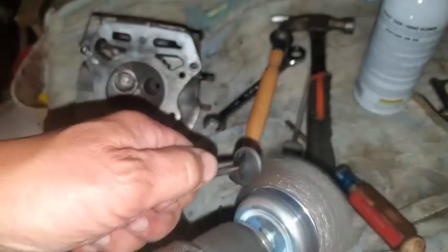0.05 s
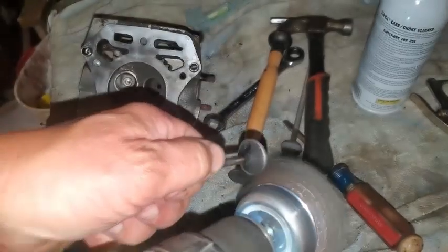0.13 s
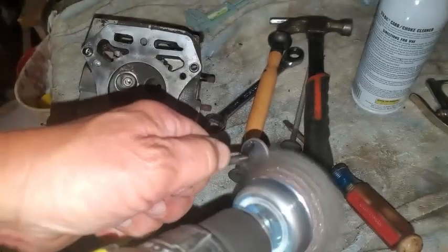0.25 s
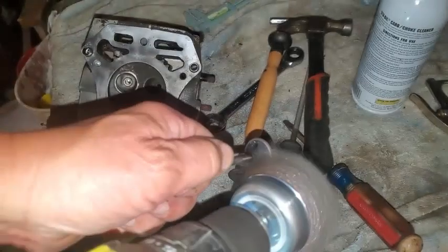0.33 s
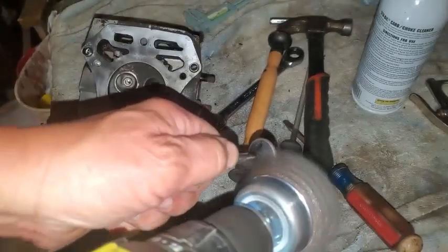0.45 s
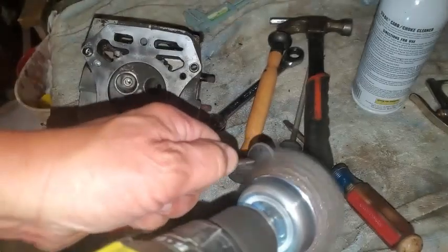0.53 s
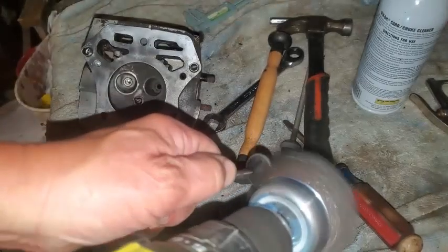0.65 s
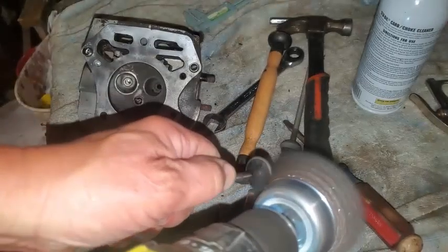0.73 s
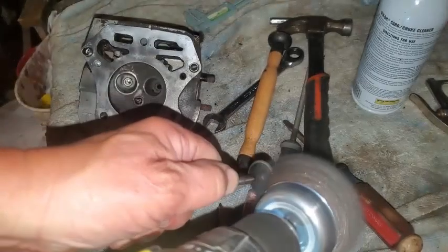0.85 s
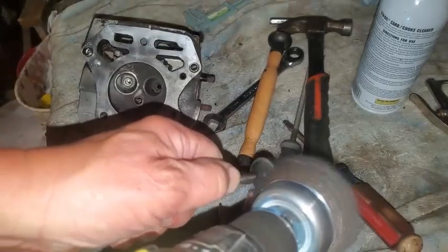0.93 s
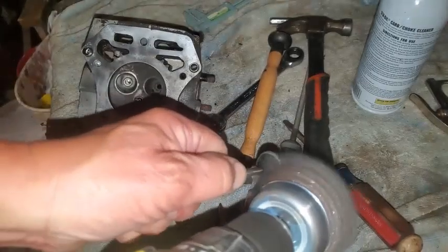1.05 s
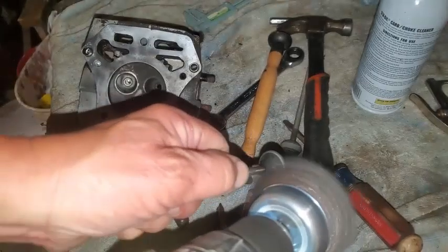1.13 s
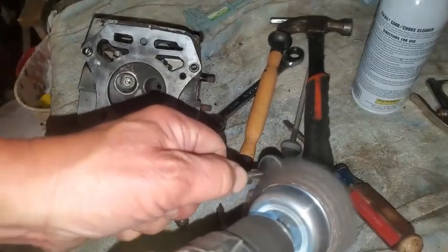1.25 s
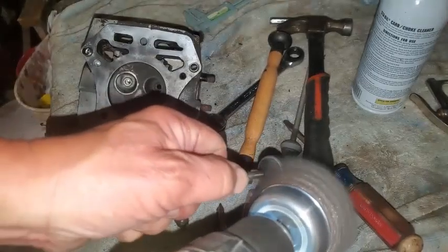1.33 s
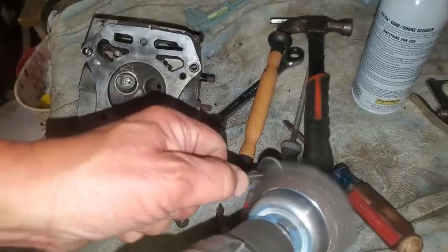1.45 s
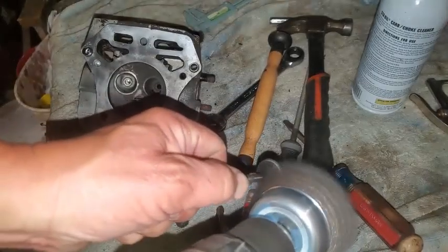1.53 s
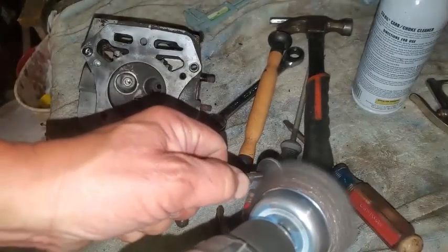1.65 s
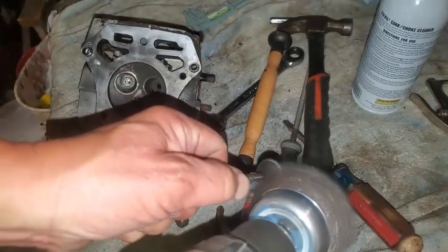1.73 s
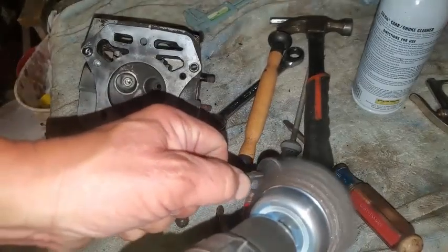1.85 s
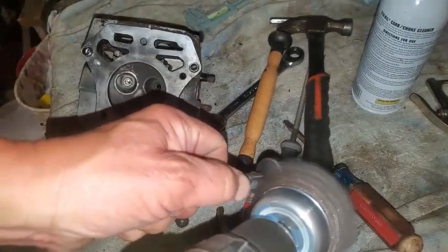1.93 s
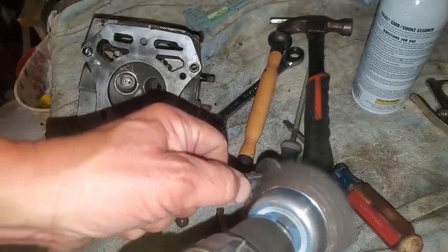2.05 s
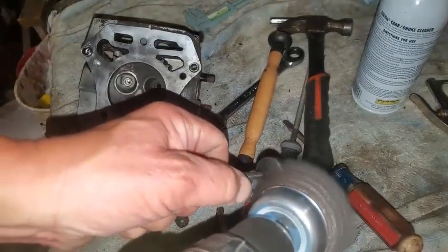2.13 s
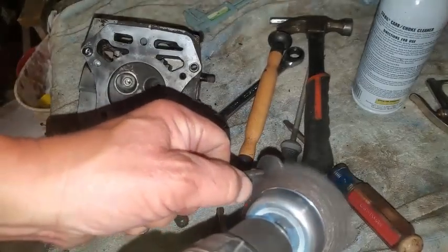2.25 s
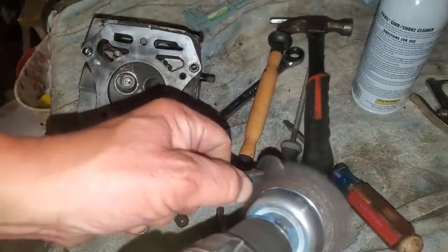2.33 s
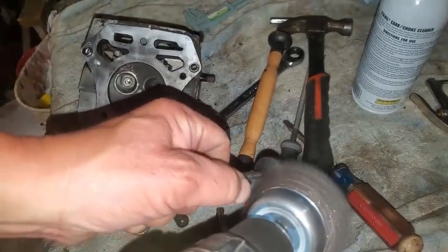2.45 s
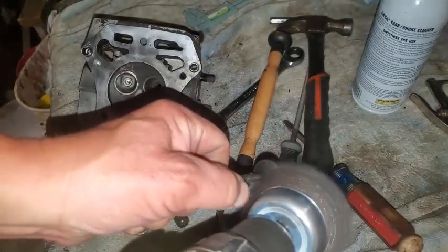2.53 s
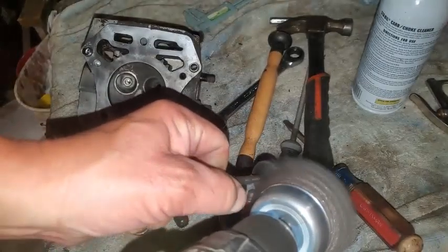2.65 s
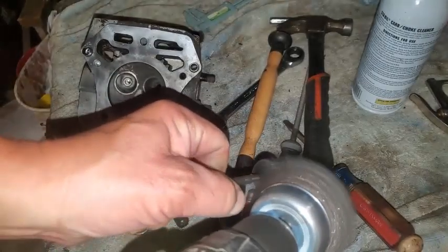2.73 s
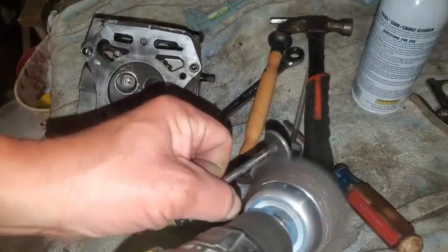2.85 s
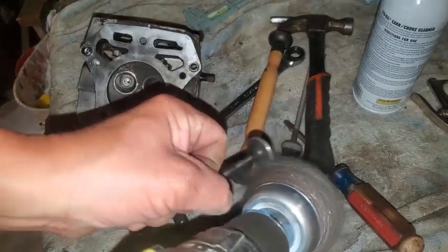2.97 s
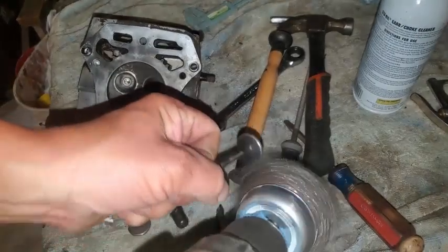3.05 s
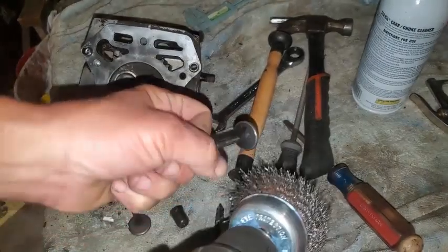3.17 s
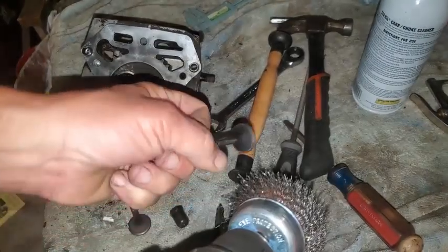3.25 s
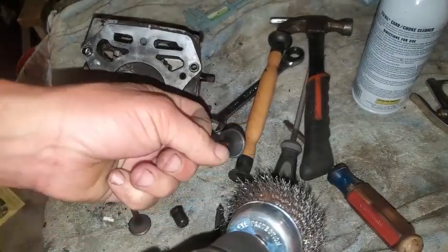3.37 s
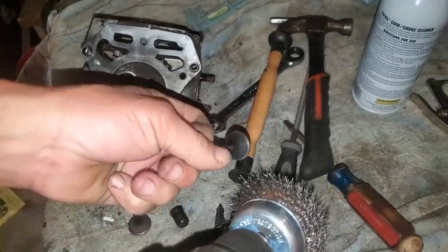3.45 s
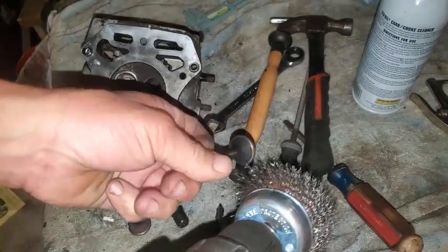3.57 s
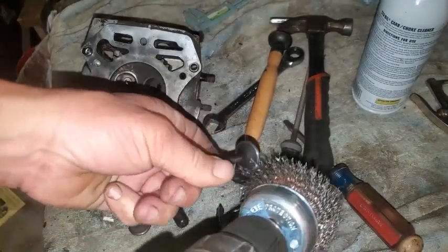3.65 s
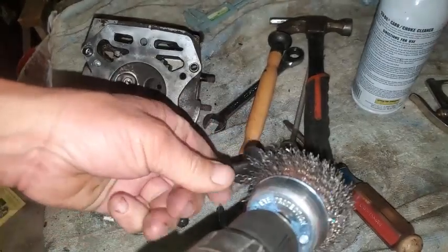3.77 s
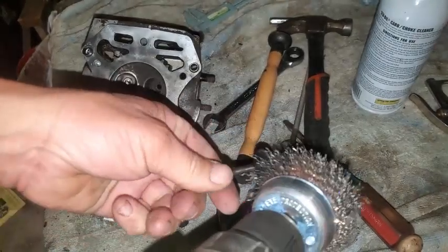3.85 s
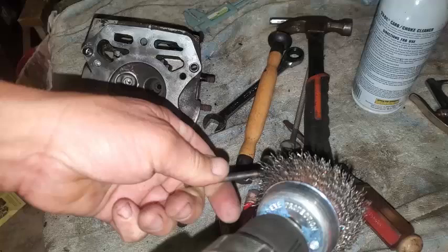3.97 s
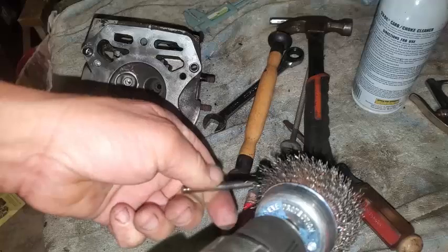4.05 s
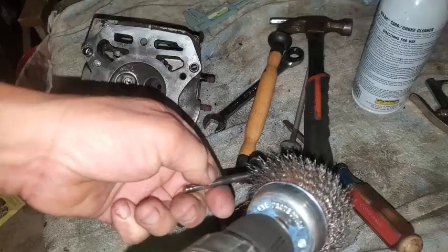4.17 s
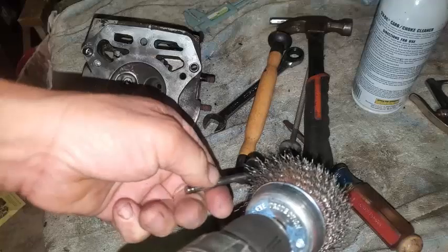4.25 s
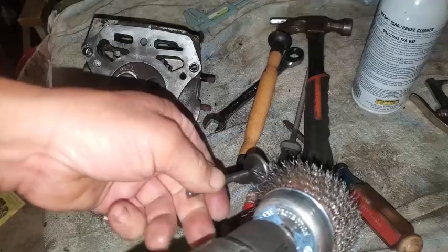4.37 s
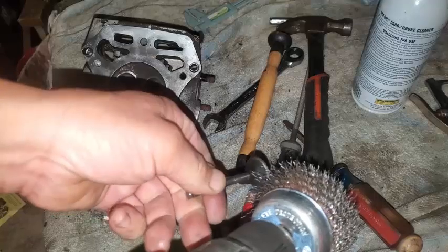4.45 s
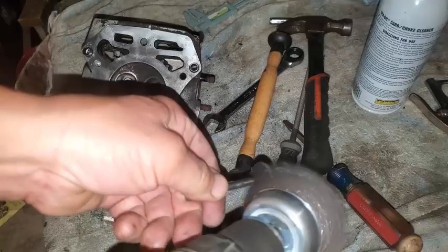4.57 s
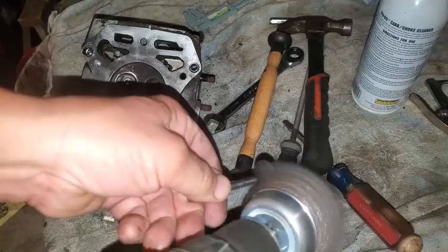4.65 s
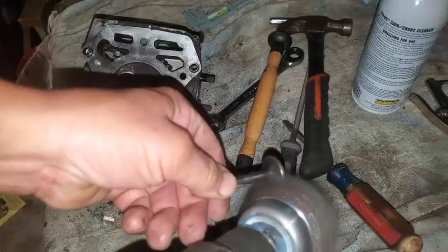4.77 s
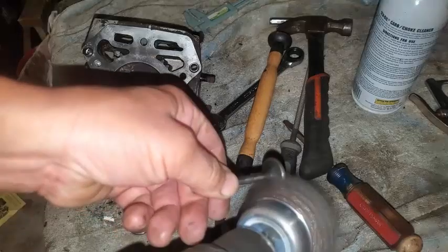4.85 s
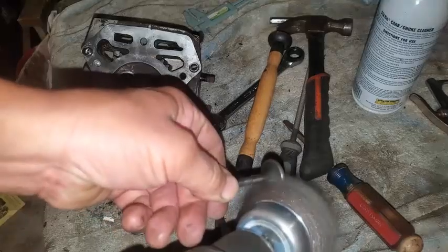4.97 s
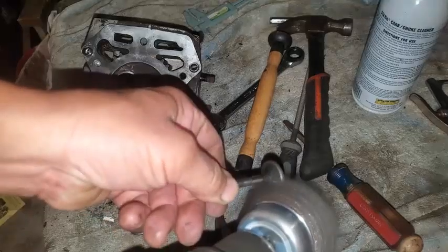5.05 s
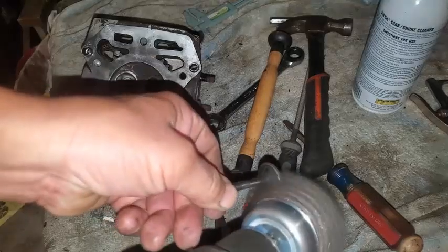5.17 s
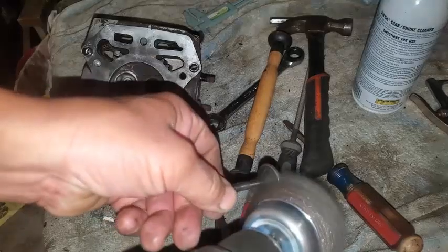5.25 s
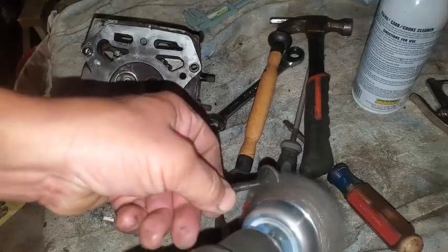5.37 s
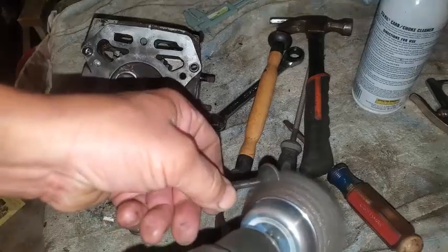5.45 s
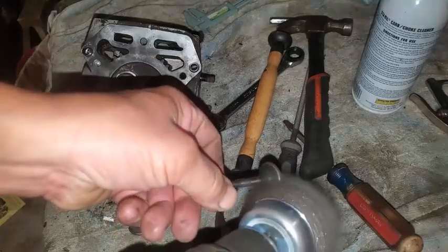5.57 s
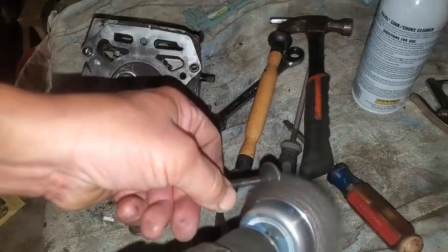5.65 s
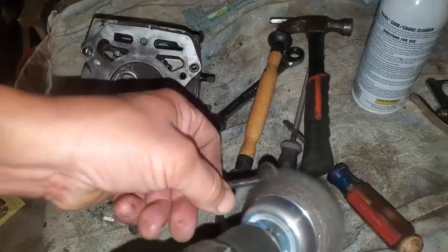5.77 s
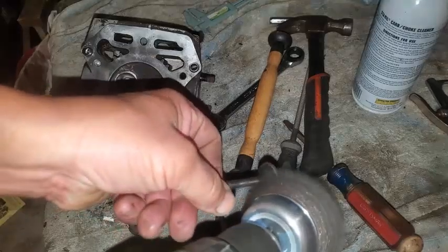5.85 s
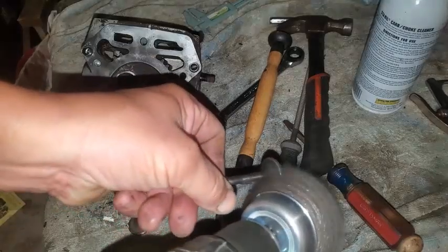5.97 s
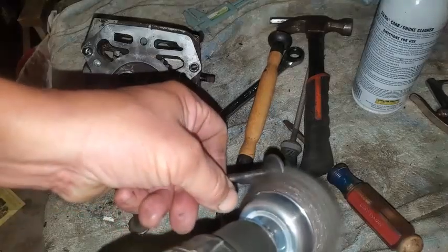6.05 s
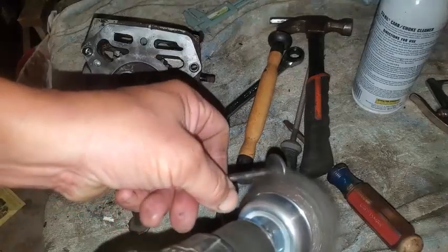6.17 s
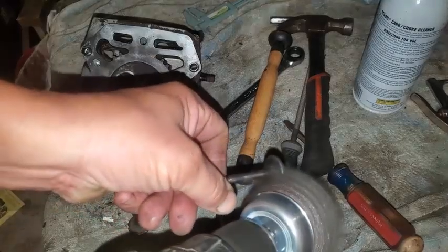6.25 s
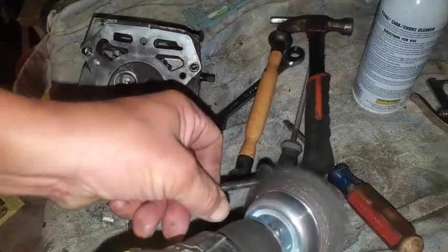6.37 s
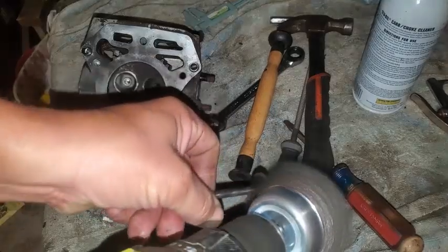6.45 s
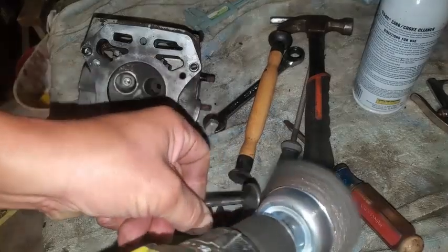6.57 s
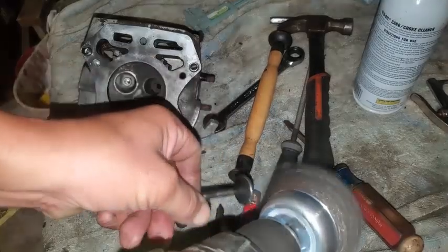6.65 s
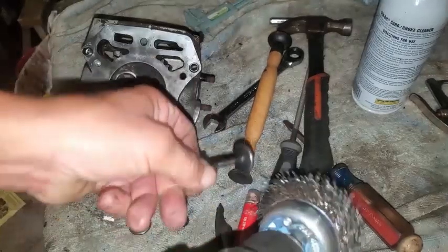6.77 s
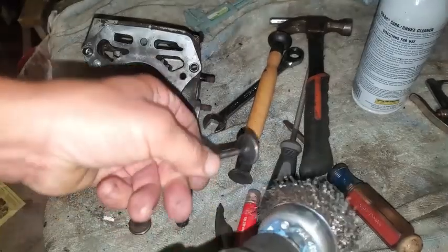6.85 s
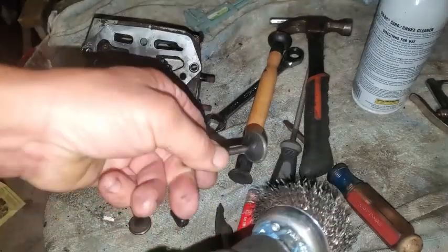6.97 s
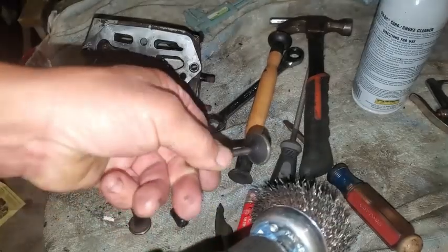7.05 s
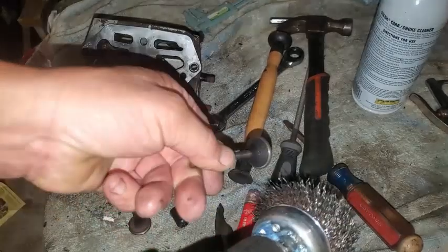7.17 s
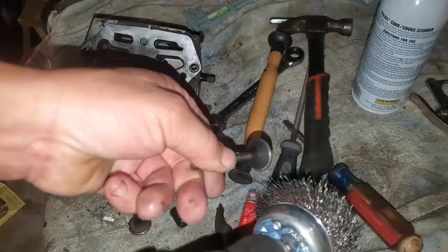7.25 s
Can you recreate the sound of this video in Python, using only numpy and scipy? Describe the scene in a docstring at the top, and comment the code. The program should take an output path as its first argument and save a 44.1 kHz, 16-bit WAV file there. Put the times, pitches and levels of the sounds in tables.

```python
"""Cordless drill with wire wheel on a steel valve

Two bursts close to a phone over a workbench: shaft-locked tones whine up to speed and howl down under the brake.
Random tiny impacts through resonances make wire tips scrub steel and gears rasp; a narrow hiss follows the motor.
Short noise bursts are knocks of chuck and gears; soft noise bands are fingers and valve on the still tool.
A low workshop hum of wavering tones and filtered air lies beneath, with a short room tail."""
import sys
import numpy as np
from scipy import signal
from scipy.fft import rfft, irfft, next_fast_len
from scipy.io import wavfile
from scipy.ndimage import uniform_filter1d, minimum_filter1d

SR = 44100
rng = np.random.default_rng(int(sys.argv[2]) if len(sys.argv) > 2 else 0)


def output_pcm(signal):
    """Save a mono or channel-first signal as 16-bit PCM at the path in sys.argv[1].

    Samples are clipped to [-1, 1] before scaling.
    """
    pcm = np.clip(np.atleast_2d(signal).T, -1, 1) * 32767
    wavfile.write(sys.argv[1], SR, np.round(pcm).astype(np.int16))


N = 322371
T = np.arange(N) / SR
GEAR_RATIO = 14.35  # shaft turns per wheel turn
TOP_SPEED_HZ = 379.5  # usual top speed of the motor shaft, turns a second
WHEEL_LAG, MOTOR_LAG, HISS_LAG = 8, 2, 10  # delay to the right port, samples
BRAKE_S = .158  # time the brake takes to stop the shaft
# trigger pulls: on_s, off_s, scrub_db (wires on steel, once settled), lift_s (valve taken away), drop_db (when lifted)
PULLS = [(-0.0105, 2.985, -24.5, 3.034, 8), (4.602, 6.677, -24.5, 6.711, 10)]


def amp(db):
    """Decibels to gain."""
    return 10 ** (np.asarray(db) / 20)


def unit(x):
    """Scale to rms 1."""
    return x / np.sqrt(np.mean(x ** 2))


def curve(rows):
    """A level or speed that moves in straight lines between (s, value) points."""
    seconds, values = np.transpose(rows)
    return np.interp(T, seconds, values)


def walk(rate):
    """Smooth random drift of rms 1; rate is new random values a second."""
    k = int(SR / rate)
    steps = np.repeat(rng.standard_normal(N // k + 1), k)
    return unit(uniform_filter1d(uniform_filter1d(steps, k), k)[:N])


def colour(x, points, power=1):
    """Filter by a spectrum of (Hz, dB) points, joined on a log frequency axis."""
    hz, db = np.transpose(points)
    size = next_fast_len(x.shape[-1] + 4096)
    f = np.maximum(np.fft.rfftfreq(size, 1 / SR), 1)
    gain = amp(power * np.interp(np.log(f), np.log(hz), db))
    return irfft(rfft(x, size) * gain, size)[..., :x.shape[-1]]


def resonate(x, hz, width):
    """A resonance with gain 1 at its centre."""
    return signal.lfilter(*signal.iirpeak(hz, hz / width, fs=SR), x)


def resonate_twice(x, hz, width):
    """Two equal resonances in a row give steeper skirts; the result has rms 1."""
    return unit(resonate(resonate(x, hz, width), hz, width))


def ring(x, modes):
    """A body of several resonances, each (Hz, width Hz, dB)."""
    return sum(amp(db) * resonate(x, hz, width) for hz, width, db in modes)


def strikes(rate, spread_db):
    """Random tiny impacts, rate a second, of uneven size; fewer ones hit harder."""
    hits = (rng.random(N) < rate / SR) / np.sqrt(rate)
    return unit(hits * rng.standard_normal(N) * amp(spread_db * rng.standard_normal(N)))


def ports(x, lag=WHEEL_LAG):
    """Sound from the left reaches the right port a few samples later."""
    return np.array([x, np.pad(x, (lag, 0))[:N]])


def spread(source, direct):
    """A wide source: a share of the power is common to both ports, the rest is separate in each."""
    return np.sqrt(direct) * ports(source()) + np.sqrt(1 - direct) * np.array([source(), source()])


def flare(x, size=2048):
    """Narrow bands swell and sink at random, each for a moment."""
    spread_db, width_hz, life_s = 4.6, 55, .07
    overlap = size * 3 // 4
    bands = signal.stft(x, nperseg=size, noverlap=overlap)[2]
    chance = rng.standard_normal(bands.shape[1:])
    chance = uniform_filter1d(chance, round(width_hz * size / SR), axis=0)
    chance = uniform_filter1d(chance, round(life_s * SR * 4 / size), axis=1)
    gain = unit(amp(spread_db * np.minimum(unit(chance), 1.2)))
    return signal.istft(bands * gain, nperseg=size, noverlap=overlap)[1][:, :N]


def workshop():
    """A machine hum of slowly wavering tones over a soft noise rumble and a trace of hiss."""
    # steady hum tones: pitch_hz, relative level_db
    hum_tones = [(50.5, -79), (74.2, -78), (92.5, -71), (123.8, -72.5), (149.5, -72.5), (172, -82),
                 (198, -71), (247.6, -87.5), (279, -90), (370.5, -83)]
    # spectrum of the workshop air: frequency_hz, relative level_db
    air_colour = [(15, -42), (25, -27), (45, -8.5), (100, -9), (140, -13.5), (204, -16.5), (305, -22),
                  (420, -20.5), (546, -37), (928, -39), (1110, -46), (3450, -52), (5050, -41), (10500, -65),
                  (13600, -96.5), (22000, -120)]
    # shared level of hum and air: time_s, level_db
    air_level = [(3.3, -60), (4.1, -65.5), (4.5, -58), (7.0, -66)]
    hum = sum(amp(db + walk(3.4)) * np.sin(2 * np.pi * hz * T + .3 * walk(2.3)) for hz, db in hum_tones)
    hum = ports(unit(hum))[::-1]  # swapped: it arrives from the right
    air = spread(lambda: unit(colour(rng.standard_normal(N), air_colour)), direct=0.49)
    hiss = amp(-90.0) * unit(resonate(rng.standard_normal((2, N)), 2500, 3500))
    return (amp(-2.0) * hum + amp(-9) * air) * amp(curve(air_level)) + hiss


def room(x, t60_s=0.26, wet_db=-11, count=4):
    """A small cluttered room: a short dense tail whose reflections shift as the hands move."""
    age = T[:SR // 2]
    decay = amp(-60 * age / t60_s) * np.clip(age / 0.0034, 0, 1)
    tails = rng.standard_normal((count, 2, len(age))) * decay
    tails = tails / np.sqrt(np.sum(tails ** 2, axis=2, keepdims=True))
    # drifting mix of the tails at constant total power
    shares = np.array([walk(2.974) for _ in tails])
    shares = shares / np.sqrt(np.sum(shares ** 2, axis=0))
    wet = sum(share * signal.oaconvolve(x, tail, axes=1)[:, :N] for share, tail in zip(shares, tails))
    return amp(wet_db) * wet


def touches():
    """Fingers, trigger and valve brush the resting tool: noise bands swell and die like wires set ringing."""
    # brushes: start_s, level_db, centre_hz, width_hz (of each of two resonances), decay_s
    brushes = [(3.35, -89, 4500, 2480, .25), (3.665, -69, 6600, 1200, 0.035),
               (3.89, -78, 1800, 4000, 0.032), (4.12, -81.5, 5080, 1200, 0.065),
               (4.46, -71.5, 3010, 4500, 0.11), (4.538, -55, 1300, 1980, 0.0031),
               (7.255, -71.5, 6600, 1800, .05)]
    out = 0
    for s, db, hz, width, decay_s in brushes:
        age, rise_s = np.maximum(T - s, 0), 0.5 * decay_s
        swell = np.minimum(age / rise_s, 1) ** 2
        fall = np.exp(-np.maximum(age - rise_s, 0) / decay_s)
        out = out + amp(db) * swell * fall * resonate_twice(rng.standard_normal((2, N)), hz, width)
    return out


def clacks(gain_db=-6):
    """Slack in chuck and gears knocks shut: a sharp crack of noise with a few milliseconds of steel rattle."""
    # knocks: start_s, level_db (before gain_db), decay_s
    knocks = [(3.028, -10, 0.0025), (3.032, -3, 0.0025), (3.071, -11.5, 0.0046), (3.099, -12, 0.0031),
              (3.1034, -8.5, 0.0014), (3.12, -24, 0.0074), (4.595, 1, 0.0018), (4.6, -18, .014),
              (4.627, -12.5, 0.0031), (4.67, -15, 0.0034), (6.716, -1.5, 0.0016), (6.7296, 4.5, 0.0015),
              (6.784, -16.5, 0.021), (6.7942, -19.5, .002), (6.81, -18.5, 0.004)]
    # knock spectrum: frequency_hz, relative level_db
    knock_colour = [(100, -20), (500, -5.5), (1200, -0.5), (2300, 5.5), (3500, 2), (6500, -2.5),
                    (8000, -12), (11000, -14.5)]
    force = np.zeros(N)
    for s, db, decay_s in knocks:
        age = T[T >= s] - s
        force[T >= s] += amp(db + gain_db) * np.exp(-age / decay_s)
    return spread(lambda: unit(colour(rng.standard_normal(N), knock_colour)), direct=0.36) * force


def trigger():
    """Shaft speed and scrub level: each pull spins the motor up to its free speed, each release brakes it."""
    # free speed of the shaft, drifting with the load: time_s, speed_hz (turns a second)
    free_speed = [(0.3, 380.5), (0.5, 378.4), (0.95, 380.4), (1.6, 379.4), (2.4, 378.0), (2.9, 378.8),
                  (4.95, 380.0), (5.3, 380.7), (6.2, 377.9), (6.62, 380.5)]
    spin_up_hz_per_s, knee = 3570, 3.95  # a higher knee levels off more sharply
    brake_power = 1.46  # above 1 the brake bites ever harder
    bite_db, bite_s = 3, 0.4  # the wires bite harder at first, then settle
    speed, scrub_db, free = np.zeros(N), np.zeros(N), curve(free_speed)
    for on, off, db, lift_s, drop_db in PULLS:
        age, released = np.maximum(T - on, 0), np.clip(T - off, 0, BRAKE_S)
        rise = spin_up_hz_per_s * age / TOP_SPEED_HZ
        spin_up = rise / (1 + rise ** knee) ** (1 / knee)
        speed = speed + free * spin_up * (1 - (released / BRAKE_S) ** brake_power)
        lifted = np.clip((T - lift_s) / 0.0054, 0, 1)
        scrub_db = np.where(T >= on, db + bite_db * np.exp(-age / bite_s) - drop_db * lifted, scrub_db)
    # the hand's pressure wavers slightly
    return speed * (1 + 0.00064 * walk(25)), scrub_db + 0.04 * walk(7.6)


def load(speed):
    """Strain on the motor, 0-1: a surge of current after each pull, the brake after each release."""
    surge_s, grip_s, brake_fade_hz = .2, .04, 220  # the brake lets go below this shaft speed
    drive = sum((T >= on) * np.exp(-((T - on) / surge_s) ** 2) for on, *_ in PULLS)
    grip = sum(np.clip((T - off) / grip_s, 0, 1) * (T < off + BRAKE_S) for _, off, *_ in PULLS)
    return drive, grip * np.minimum(speed / brake_fade_hz, 1) ** 2


def narrow_hiss(speed):
    """A narrow band of hiss near 2.2 kHz; its amplitude grows with the square of motor speed."""
    centre_hz, width_hz, level_db = 2247, 820, -35.5  # level at top speed
    hiss = resonate_twice(rng.standard_normal(N), centre_hz, width_hz)
    hiss = hiss * amp(level_db + 0.66 * walk(8)) * (speed / TOP_SPEED_HZ) ** 2
    return flare(ports(hiss, HISS_LAG))


def motor(speed, turns, drive, brake):
    """Tones at multiples of the shaft rate; under load each shouts as it sweeps through a housing resonance."""
    # tones: multiple of shaft rate, level_db, drive_db (extra speeding up), brake_db (extra braking),
    # share of housing lift (0-1), pan_db (left minus right), fade_hz (shaft speed below which it fades)
    tones = [(1, -49, -6.5, -12.5, 0.03, 0.5, 150), (2, -53, -3.5, -7, .5, 2.5, 150),
             (4, -59, 12.5, 15, 0.95, 0.5, 180), (5, -51, -5, -7.5, .6, 1, 200),
             (8, -41.5, 9.5, 5.5, 0.6, -12, 260), (9, -53, 3, -5.5, .4, -1, 200),
             (12, -44.5, 2, -6.5, .3, 3, 340), (16, -50.5, 13.5, -4, .5, 2.5, 220),
             (19, -34, 4.5, -14, 0.99, 1.5, 150), (24, -56.5, -0.5, -7, .5, -7, 200)]
    # the gearbox splits the shaft tone: offset in wheel turns, level_db at top speed
    sidebands = [(-2, -61), (-1, -60), (1, -60), (2, -52), (3, -55)]
    # drill housing: centre_hz, width_hz, lift_db
    housing = [(900, 200, 16), (1900, 220, 7), (2400, 290, 14), (4000, 500, 4), (6400, 900, 5)]
    strain = drive + brake
    out = 0
    for multiple, db, drive_db, brake_db, share, pan_db, fade_hz in tones:
        flutter = (0.49 + .25 * strain) * walk(200)  # phase, radians
        tone = np.sqrt(2) * np.sin(2 * np.pi * (multiple * turns + rng.random()) + flutter)
        lift_db = sum(lift * np.exp(-((multiple * speed - hz) / width) ** 2) for hz, width, lift in housing)
        strain_db = share * lift_db + 4 * np.tanh(walk(110))
        level_db = db + drive_db * drive + brake_db * brake + 1.7 * walk(18) + strain * strain_db
        tone = tone * amp(level_db) * np.clip(speed / fade_hz, 0, 1) ** 3
        pan = pan_db * (1 - strain)  # strain draws the tone to the middle
        out = out + ports(tone, MOTOR_LAG) * amp(np.array([pan, -pan]) / 2)
    for offset, db in sidebands:
        tone = np.sqrt(2) * np.sin(2 * np.pi * (turns * (1 + offset / GEAR_RATIO) + rng.random()))
        level = amp(db + 3.0 * walk(9.8)) * (1 - strain) * speed / TOP_SPEED_HZ
        out = out + ports(tone * level, MOTOR_LAG)
    return out


def wheel(speed, turns, scrub_db, drive):
    """Wire tips flick the valve by the thousand, a little harder once a turn; gear teeth rasp in their case."""
    # spectrum of wire tips on the valve: frequency_hz, relative level_db
    scrub_colour = [(30, -21), (130, -12.5), (240, -25), (370, -6), (560, -10), (800, -3.5), (950, -5),
                    (1400, -0.5), (1900, 1), (2150, -10), (2420, 0.5), (2600, -4.5), (2800, -3), (2920, -4),
                    (3350, 0), (3570, -2.5), (4000, -2), (5500, -1.5), (6900, -1), (7450, -25.5),
                    (8100, -22), (8700, -8), (10700, -11.5)]
    # ring of valve and wheel: centre_hz, width_hz, relative level_db
    steel = [(2410, 80, -9.5), (2827, 60, -0.5), (4256, 830, -2), (4539, 85, -8), (6630, 560, -16.5)]
    # gearbox resonances: centre_hz, width_hz, relative level_db
    gearbox = [(1744, 190, 5.5), (1590, 170, -6.5)]
    # how hard the wheel shakes the bench: time_s, level_db relative to the scrub level
    shake_level = [(0.05, -30.5), (0.22, -25), (0.45, -35.5), (1.7, -32.5), (2.9, -30.5), (4.7, -31),
                   (5.6, -35), (6.6, -29)]
    pace = speed / speed.max()
    rate = 3000 + 28000 * pace  # impacts a second
    wobble = np.cos(2 * np.pi * turns / GEAR_RATIO)

    def wires():
        tips = strikes(rate, spread_db=3.0)
        return unit(colour(tips + ring(tips, steel), scrub_colour))

    def teeth():
        return unit(ring(strikes(rate / 4, spread_db=1.0), gearbox))

    def grains():
        return unit(resonate(strikes(2500, spread_db=1.5), 1900, 1900))

    def rumble(hz, width):
        return resonate_twice(strikes(rate / 4, spread_db=2.5), hz, width)

    scrub = spread(wires, direct=0.4) * amp(1.43 - 10.0 * (1 - pace) + 0.24 * wobble + 0.18 * walk(25))
    rasp = spread(teeth, direct=0.81) * amp(-8.0 - 6.9 * (1 - pace) + 1.5 * wobble + 0.71 * walk(22))
    # the gears grind in coarse grains while they pull the wheel up to speed
    grind = spread(grains, direct=.5) * amp(-8.5) * drive
    # the valve chatters dully between the fingers
    chatter = spread(lambda: rumble(hz=710, width=660), direct=0.72)
    chatter = chatter * amp(-19.0 + 2.1 * wobble + 3.6 * walk(35))
    # the unbalanced wheel shakes the bench once a turn
    shake = spread(lambda: rumble(hz=83.0, width=110), direct=0.45)
    shake = shake * amp(curve(shake_level) + 6.7 * wobble + 2.8 * walk(11.0)) * pace
    running = uniform_filter1d((speed > 0) * 1., size=200)
    return flare(scrub + rasp + grind + chatter + shake) * amp(scrub_db) * running


def scene():
    """The drill and its wheel in the room, over the workshop."""
    # the far port lies in shadow: frequency_hz, difference_db (left minus right)
    shadow = [(100, 1), (250, 7), (500, 0), (1100, 3), (1750, 5.5), (2400, 3.5), (4200, 5), (6500, 5),
              (10000, 6.5)]
    speed, scrub_db = trigger()
    turns = np.cumsum(speed) / SR
    drive, brake = load(speed)
    near = wheel(speed, turns, scrub_db, drive) + clacks()
    near = colour(near, shadow, power=np.array([[.5], [-.5]]))
    near = near + motor(speed, turns, drive, brake) + narrow_hiss(speed) + touches()
    return near + room(near) + workshop()


def record(dry):
    """The phone's limiter ducks peaks above its ceiling and recovers steadily; the top is cut steeply."""
    ceiling, recovery_db_per_s, top_hz = 0.51, 351, 10900  # ceiling as a share of full scale
    over_db = 20 * np.log10(np.maximum(np.abs(dry).max(axis=0) / ceiling, 1))
    recovery_db = recovery_db_per_s * T
    duck_db = np.maximum.accumulate(over_db + recovery_db) - recovery_db
    # about a millisecond of look-ahead, smoothed
    gain = uniform_filter1d(minimum_filter1d(amp(-duck_db), size=45), size=45)
    return signal.sosfilt(signal.ellip(12, .2, 80, top_hz, fs=SR, output="sos"), dry * gain)


dry = scene()
out = record(dry)
output_pcm(out)
```